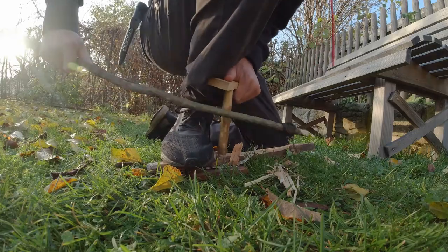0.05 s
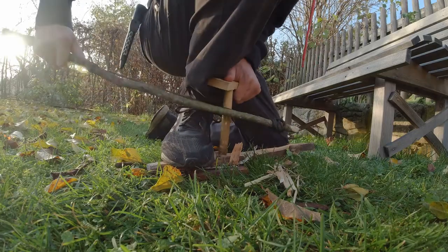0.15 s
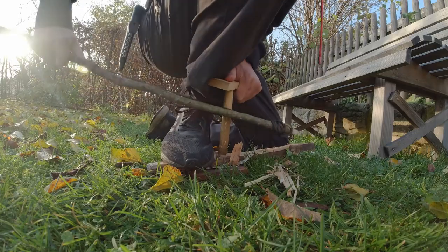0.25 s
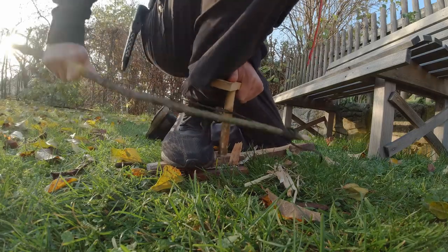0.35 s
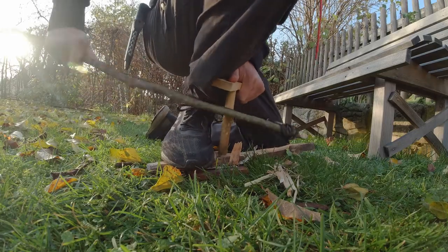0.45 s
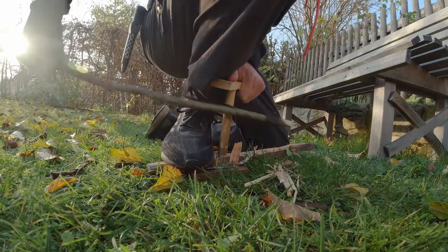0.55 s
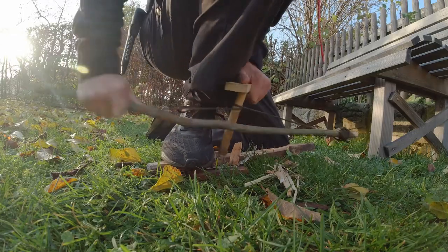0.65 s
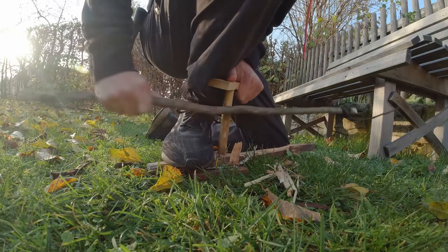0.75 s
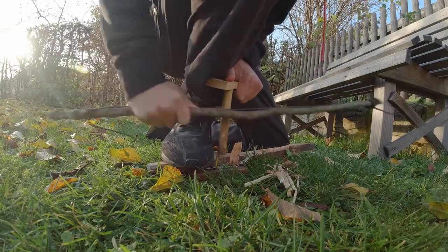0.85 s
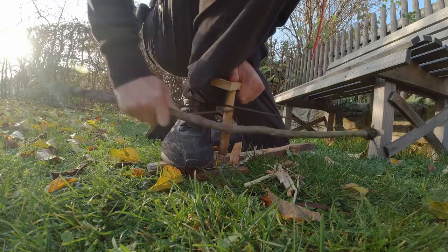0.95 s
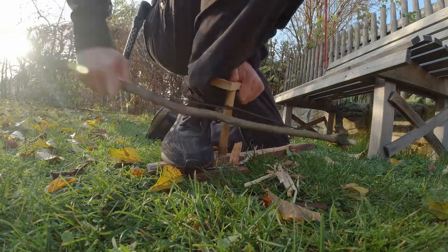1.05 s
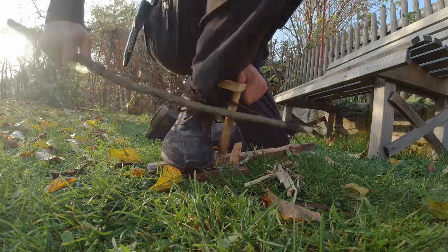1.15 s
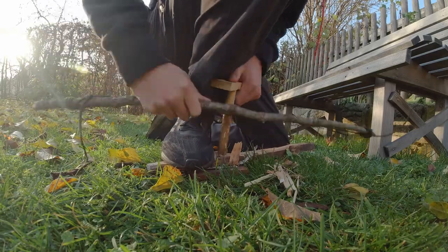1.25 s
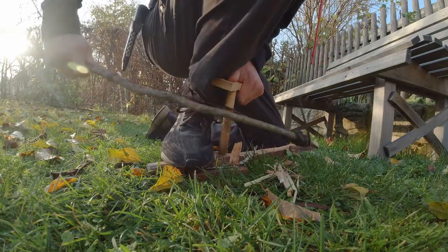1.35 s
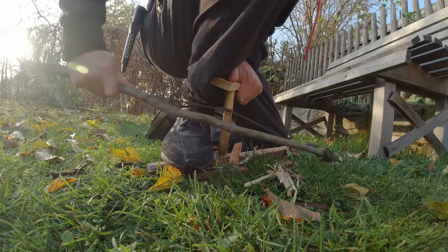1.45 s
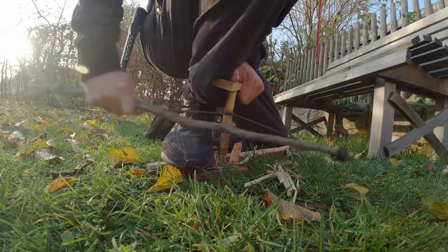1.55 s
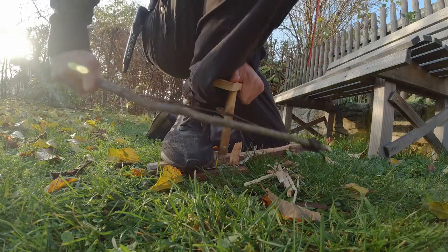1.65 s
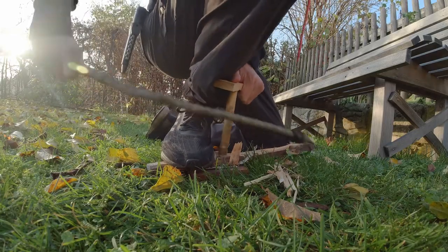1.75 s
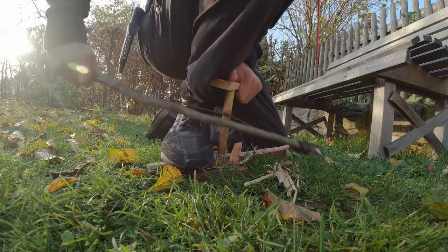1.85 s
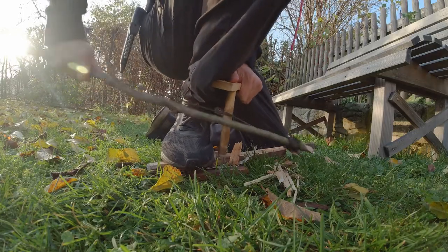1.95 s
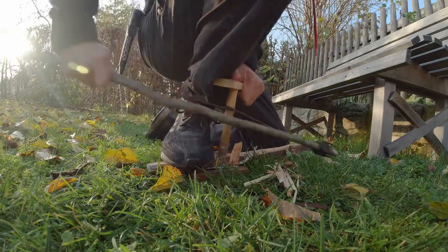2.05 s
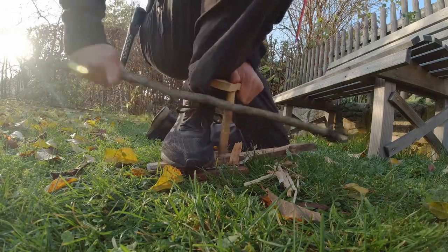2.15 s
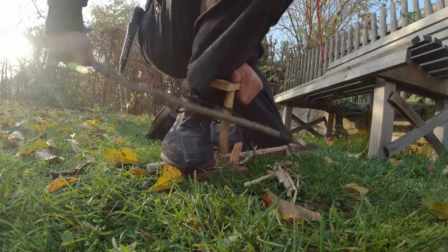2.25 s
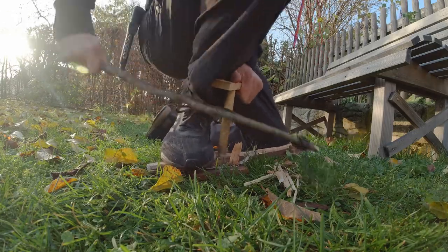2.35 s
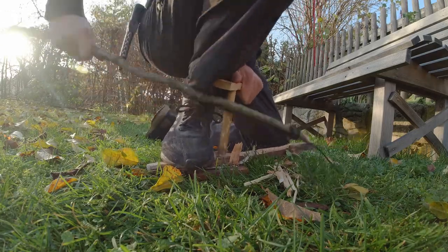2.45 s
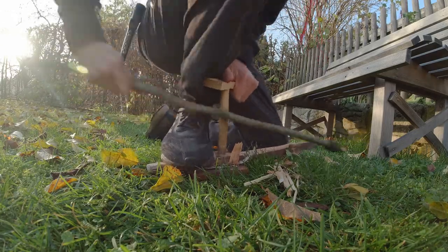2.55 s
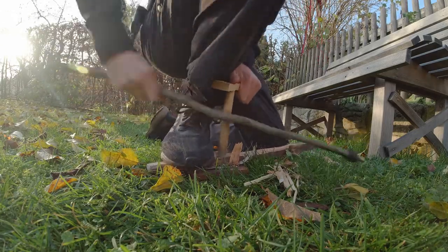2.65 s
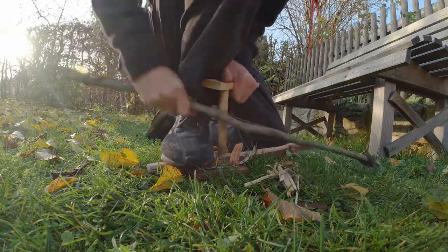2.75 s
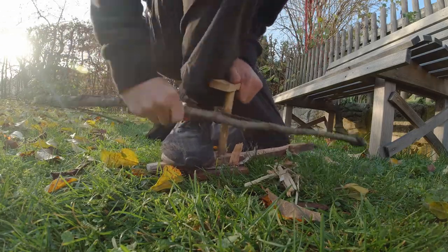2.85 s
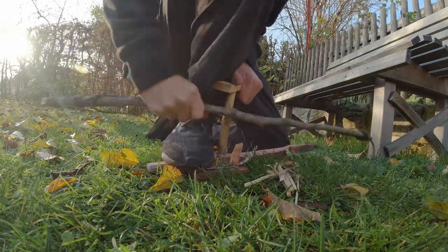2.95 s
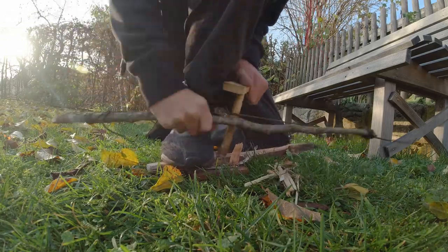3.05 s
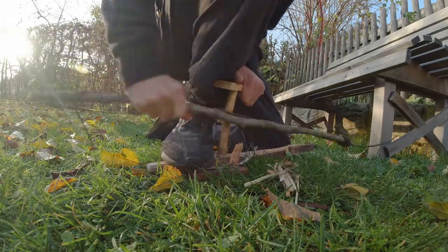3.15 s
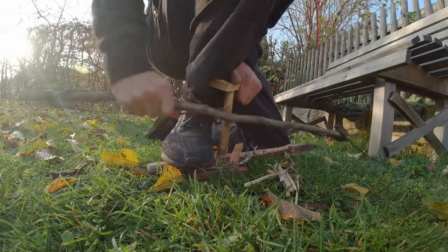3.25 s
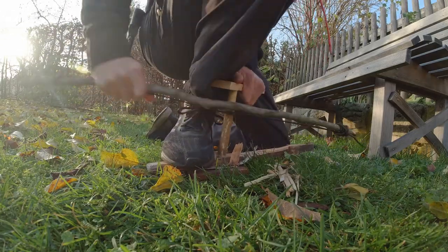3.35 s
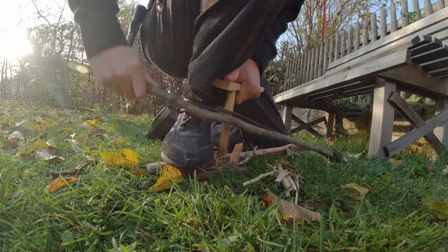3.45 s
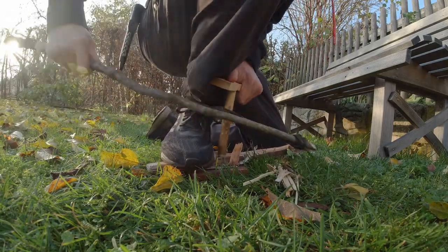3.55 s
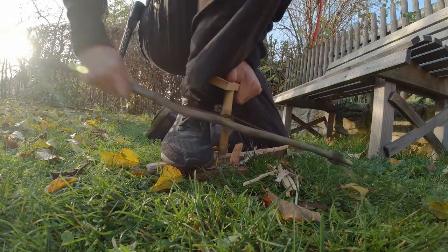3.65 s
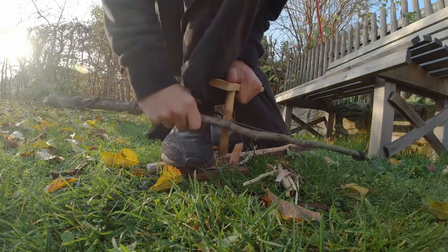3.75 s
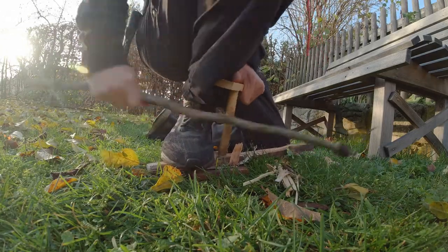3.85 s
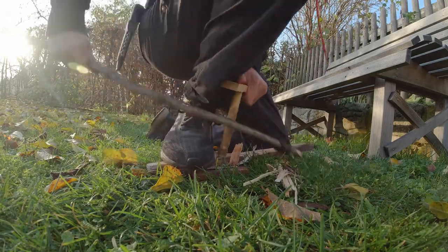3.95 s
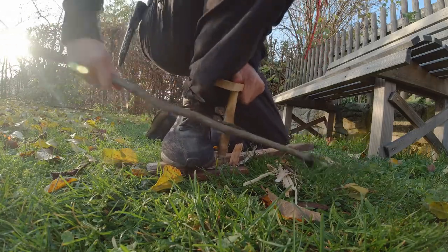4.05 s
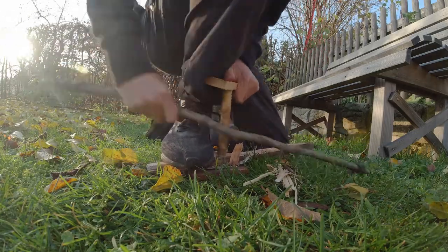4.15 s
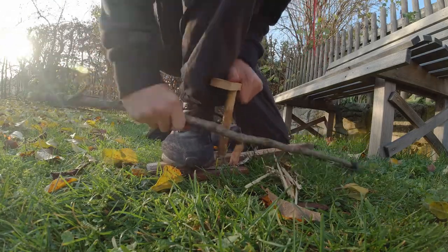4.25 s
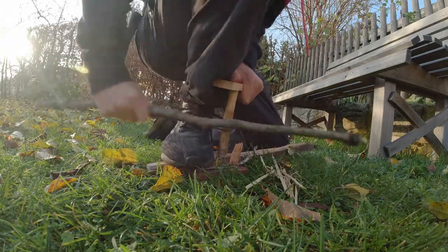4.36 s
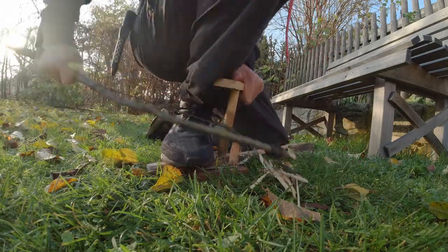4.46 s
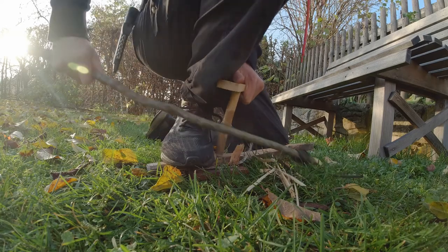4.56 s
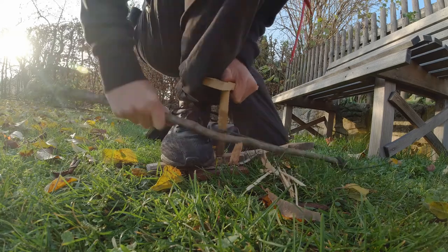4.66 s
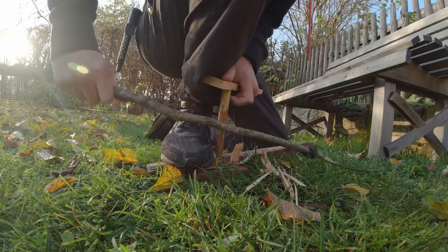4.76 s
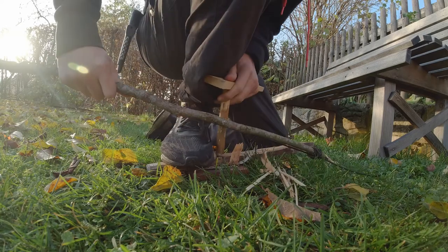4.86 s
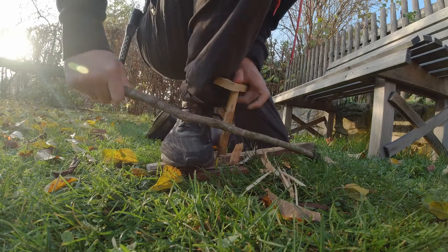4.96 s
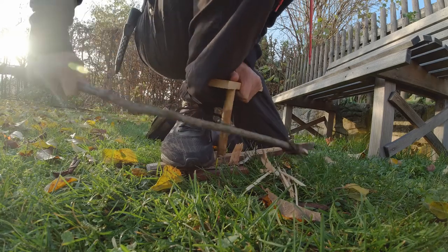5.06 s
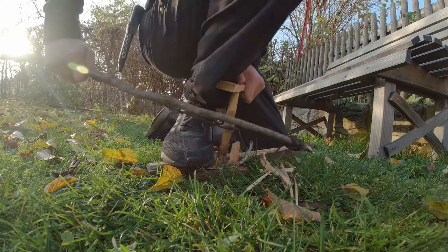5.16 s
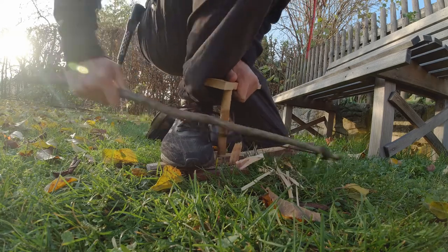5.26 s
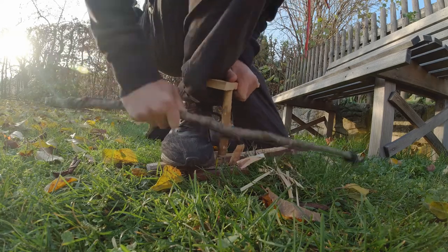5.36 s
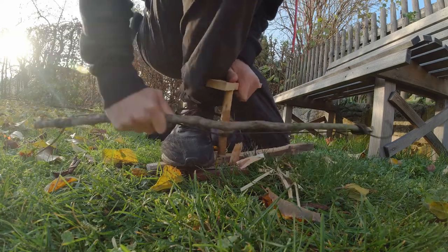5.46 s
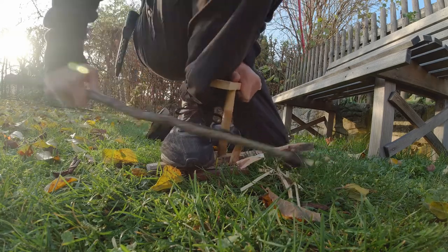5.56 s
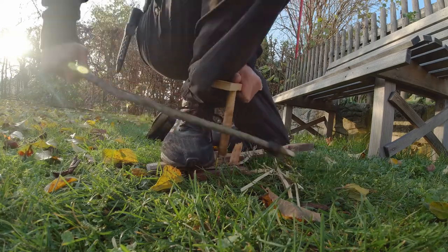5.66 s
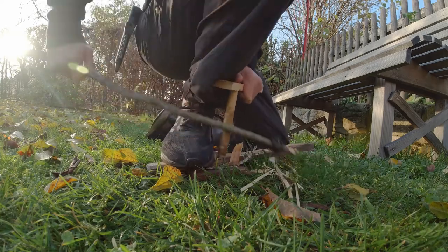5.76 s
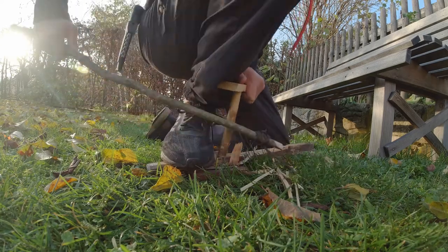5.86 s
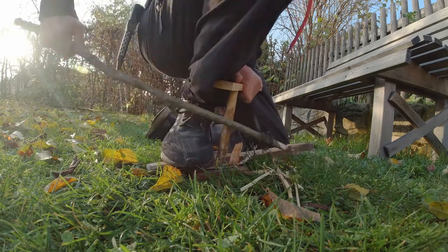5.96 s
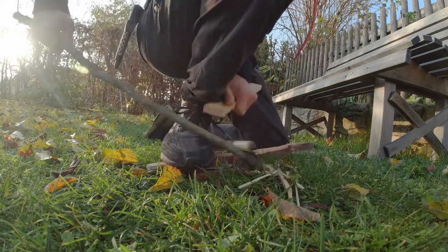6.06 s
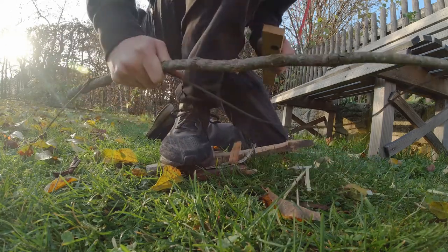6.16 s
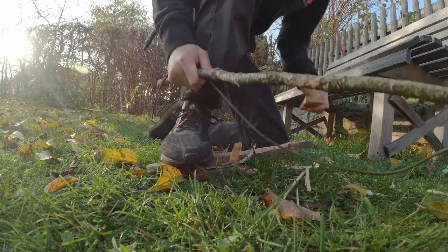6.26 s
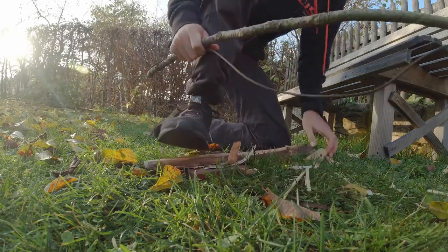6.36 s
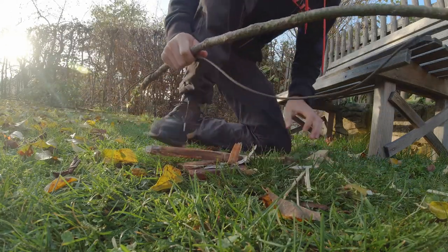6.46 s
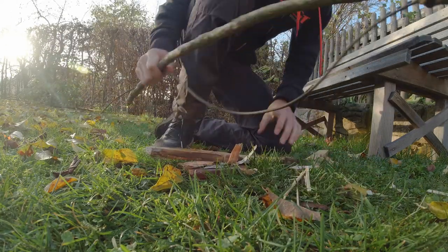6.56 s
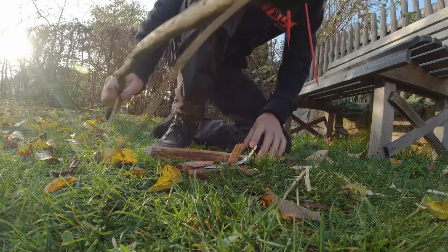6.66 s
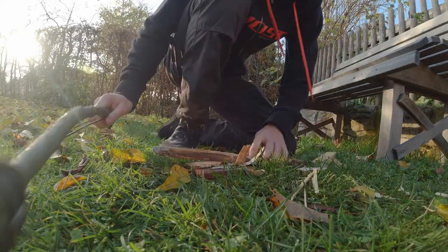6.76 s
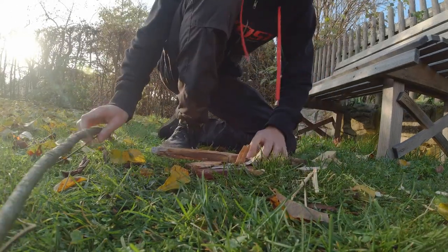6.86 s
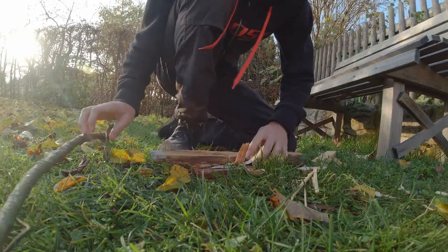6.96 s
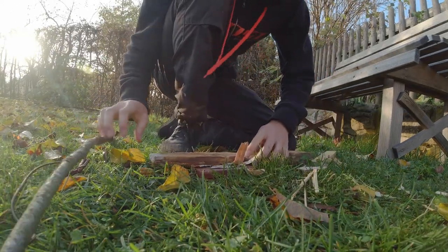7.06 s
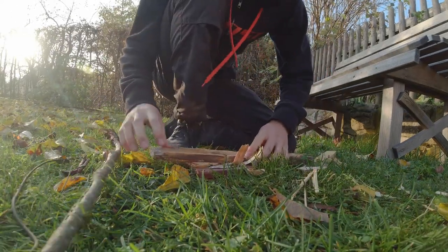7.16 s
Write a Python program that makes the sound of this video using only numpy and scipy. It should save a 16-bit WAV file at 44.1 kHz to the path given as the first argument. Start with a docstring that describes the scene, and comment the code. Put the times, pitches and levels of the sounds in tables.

```python
"""A bow drill on a lawn, close to a small stereo camera, in quiet outdoor air.
0-6.1 s: four spells of sawing. Each jerk of the cord turns the wooden spindle in its socket: it squeaks
by stick and slip, and grinds when it bites. The fireboard bumps on the soft ground now and then.
6.1-7.2 s: the spindle comes free, sticks knock, and the bow is laid in rustling grass and leaves."""
import sys
import numpy as np
from scipy import signal
from scipy.fft import rfft, irfft
from scipy.io import wavfile

SR = 44100
rng = np.random.default_rng(int(sys.argv[2]) if len(sys.argv) > 2 else 0)


def generate_wav(sig):
    """Save sig (samples, or channels by samples) to the path in sys.argv[1] as 16-bit PCM at SR."""
    pcm = np.round(np.clip(np.atleast_2d(sig).T, -1, 1) * 32767).astype(np.int16)
    wavfile.write(sys.argv[1], SR, pcm)


N = 317961
BLOCK = 8192  # samples per event

# cord jerks: t/s, length/s, squeak f/Hz, squeak level/dB, rasp level/dB, groan level/dB
JERKS = [(.061, 0.021, 1557, -27.5, -34.5, -57), (.102, 0.01, 1725, -27.5, -40, -65),
         (.121, 0.023, 1595, -21, -32.5, -51), (.166, 0.028, 1870, -31, -50, -66),
         (.223, 0.024, 1569, -24, -33.5, -68), (.274, 0.02, 1694, -31.5, -36, -56),
         (.333, 0.028, 1256, -51, -24.5, -54), (.381, 0.028, 1546, -32.5, -31, -73),
         (.434, 0.024, 1492, -25.5, -29, -59), (.54, 0.019, 1736, -33, -41, -63),
         (.595, 0.014, 1590, -33.5, -48, -42), (.64, 0.026, 1426, -24, -26, -54),
         (.694, 0.027, 1500, -57, -55, -48), (.757, 0.022, 1540, -35, -40.5, -69),
         (.868, .028, 1382, -24, -30, -53), (.996, 0.011, 1643, -27.5, -46, -73),
         (1.112, 0.027, 1495, -23, -31.5, -52), (1.217, 0.029, 1697, -49, -50, -55),
         (1.424, 0.011, 1528, -22.5, -39, -65), (1.442, 0.028, 1441, -38, -24.5, -35.5),
         (1.553, 0.024, 1282, -31.5, -26.5, -65), (1.649, 0.027, 1577, -25, -21.5, -50.5),
         (1.741, 0.023, 1527, -26, -29.5, -65), (1.847, .028, 1211, -28, -21, -38.5),
         (1.945, 0.027, 1781, -31, -19.5, -33.5), (2.048, 0.027, 1703, -47, -23, -30),
         (2.147, 0.027, 1544, -43, -39.5, -35.5), (2.208, 0.019, 1623, -31, -51, -61),
         (2.253, 0.022, 1601, -21, -35.5, -71), (2.301, 0.028, 1726, -32, -40, -70),
         (2.344, 0.039, 1246, -28.5, -36, -37), (2.436, 0.021, 1192, -30, -22, -34),
         (2.523, .024, 1197, -32, -21.5, -48), (2.607, 0.031, 1183, -41, -25, -40.5),
         (2.703, .023, 1900, -47, -29.5, -39.5), (2.79, .029, 1340, -27.5, -22.5, -31.5),
         (2.883, 0.019, 1321, -27.5, -23.5, -41), (2.938, 0.025, 1780, -32, -48, -76),
         (2.981, 0.015, 1514, -31.5, -25, -47), (3.075, 0.027, 1109, -36.5, -30, -36),
         (3.16, 0.025, 1307, -39, -33, -52), (3.271, 0.017, 1161, -27, -30.5, -46.5),
         (3.361, .019, 1564, -28.5, -28.5, -48), (3.623, 0.015, 1464, -28, -30, -57),
         (3.704, .024, 1494, -37, -24, -31.5), (3.788, 0.025, 1174, -34.5, -22.5, -46.5),
         (3.866, 0.021, 1086, -39.5, -25, -50), (3.951, 0.024, 1750, -45, -22.5, -36),
         (4.035, .021, 1300, -26, -31, -62), (4.119, 0.019, 1222, -27, -29, -47),
         (4.201, 0.016, 1242, -31.5, -24, -43.5), (4.278, .031, 1285, -42, -38.5, -54),
         (4.328, 0.019, 1533, -40, -45, -59), (4.371, .019, 1228, -23, -24, -35.5),
         (4.456, .014, 1515, -27.5, -39.5, -62), (4.497, 0.02, 1457, -39, -61, -36),
         (4.538, .024, 1204, -34.5, -37.5, -39.5), (4.578, 0.026, 1618, -46, -51.5, -44),
         (4.66, 0.019, 1450, -74, -81, -59), (4.702, .025, 1180, -81.5, -68, -50),
         (4.77, 0.017, 1035, -79, -87, -49.5), (4.916, 0.034, 936, -73.5, -79.5, -59),
         (5.146, 0.023, 1744, -33, -44, -49), (5.21, 0.039, 1710, -45, -45.5, -51),
         (5.266, 0.018, 1500, -36, -44, -50), (5.311, .02, 1608, -34, -37, -48),
         (5.391, 0.028, 1536, -40, -37.5, -50), (5.436, 0.015, 1777, -38, -43, -47),
         (5.477, 0.016, 1554, -37.5, -34, -52), (5.561, 0.016, 1536, -30.5, -34, -73),
         (5.608, .026, 1734, -41.5, -44, -67), (5.652, .017, 1332, -25, -32.5, -65),
         (5.747, 0.016, 1251, -19.5, -26, -63), (5.84, 0.017, 1168, -53, -25, -67),
         (5.934, 0.025, 1290, -40, -47, -44.5), (6.032, 0.017, 1232, -22, -23.5, -43),
         (6.074, 0.027, 1123, -41, -42, -37)]
# sawing spells: start/s, end/s, rubbing at start/dB, at end/dB, squeak octave/dB, extra hiss/dB
SPELLS = [(0.063, 1.227, -54.5, -54, -2.5, 4), (1.368, 3.411, -56.5, -52, -5, .5),
          (3.58, 4.68, -51, -55, -9, 0.5), (5.106, 6.118, -51, -49.5, -8.5, -3.5)]
# spindle and fireboard resonances: f/Hz, width/Hz, gain/dB
DRILL_MODES = [(542, 120, -7), (805, 17, 2.5), (1190, 90, 3.5), (1240, 38, 6.5), (1556, 98, 5),
               (1900, 180, 5), (2530, 130, -0.5), (2410, 72, -2.5), (2748, 17, 8), (3260, 270, 1),
               (5146, 210, 9.5), (6230, 560, 5), (9260, 30, 15.5), (9880, 160, 9.5), (10640, 57, 12)]
# bow resonances: f/Hz, width/Hz, gain/dB
BOW_MODES = [(927, 85, 4), (1817, 53, 9), (2850, 99, -4), (3800, 55, 1)]


def spindle(sag=0.0351, glide=0.02494, jitter=0.0393, bite_jitter=0.025, rise_share=0.5025):
    """Each turn is a short stick-slip squeak; every slip tears fibres, which rasp through the wood."""
    # grinding spectrum: f/Hz, level/dB
    grind_spectrum = [(120, -57.5), (200, -30), (491, -13), (821, -12.5), (1020, -14.5), (1300, -4.5),
                      (2020, -8), (2250, 2), (2910, 0.5), (3190, 4.5), (4040, -8), (5040, -15.5),
                      (8270, -20), (10900, -16.5), (16000, -28)]
    out, f = np.zeros((2, N)), freqs(BLOCK)
    t = (np.arange(BLOCK) - BLOCK // 2) / SR
    tone = colour(grind_spectrum, f) * resonances(f, DRILL_MODES)
    low, middle, high = (tone * band for band in bands(f))
    for at_s, length_s, hz, squeak_db, rasp_db, groan_db in JERKS + back_slips():
        rise_s, fall_s = rise_share * length_s, (1 - rise_share) * length_s
        octave_db, hiss_db = brightness(at_s, hz, squeak_db, rasp_db)
        force = swell(t, rise_s, fall_s, power=np.where(t < 0, 2.3, 1.7))
        # pitch sags as the spindle digs in, ragged where grinding outweighs the squeak
        bite = 1 / (1 + undb(squeak_db - rasp_db))
        ragged = (jitter + bite_jitter * bite * force) * walk(320, BLOCK)
        pitch_hz = hz * (1 + sag * (.8 - force) - glide * np.tanh(t / 0.014) + ragged)
        phase = 2 * np.pi * np.cumsum(pitch_hz) / SR
        squeak = undb(squeak_db + 2.2 * walk(97, BLOCK)) * np.sin(phase)
        squeak += undb(octave_db + 0.89 * walk(130, BLOCK)) * np.sin(2 * phase)
        for k in range(3, 8):  # pressure sharpens the slip
            overtone_db = max(squeak_db, octave_db) - 14 - 4 * (k - 2)
            squeak += force * undb(overtone_db) * np.sin(k * phase)
        # judder about once in two slips, most even on slow turns that hardly rasp
        judder_hz = 0.472 * hz
        slowness = 1 / (1 + undb(rasp_db - groan_db + 13.5))
        judder = 1 + undb(6 + 20 * slowness) / (1 + ((f / judder_hz - 1) / 0.08) ** 2)
        slips = (1 + 0.77 * np.cos(phase)) * undb(3.5 * walk(120, BLOCK))
        groan, rasp, hiss = (shaped(grit(2, BLOCK) * slips, g) for g in (low * judder, middle, high))
        grind = undb(groan_db) * groan + force ** 0.023 * (undb(rasp_db) * rasp + undb(hiss_db) * hiss)
        # a biting turn squeaks first, then breaks up into grinding
        lead_s = 0.58 * bite * rise_s
        squeak_env = swell(t + lead_s, rise_s * (1 - bite / 2), fall_s + bite * rise_s / 2, power=1.73)
        add(out, ports(1.316 * squeak_env * squeak + force * grind), at_s)
    return out


def brightness(at_s, hz, squeak_db, rasp_db, peak_hz=3100, width_hz=250, firm_db=-23.5):
    """Octave and hiss levels of a jerk: harder is brighter, and a squeak hisses less than a rasp."""
    nearest_spell = min(SPELLS, key=lambda row: abs(at_s - np.clip(at_s, row[0], row[1])))
    *_, octave_db, extra_hiss_db = nearest_spell
    resonance_db = 4.5 / (1 + (2 * (2 * hz - peak_hz) / width_hz) ** 2)
    effort_db = 20 * np.log10(np.hypot(undb(rasp_db), undb(squeak_db - 3.5)))
    hiss_db = effort_db - 8 + 0.54 * (effort_db - firm_db) + extra_hiss_db
    return squeak_db + octave_db + resonance_db, hiss_db


def back_slips(min_gap_s=.07, max_gap_s=.125, length_s=.022, centre_hz=1714, spread_db=5):
    """As the bow reverses between jerks, the spindle slips back faintly; rows as in JERKS."""
    rows = []
    for this, following, (height, size) in zip(JERKS, JERKS[1:], rng.standard_normal((len(JERKS), 2))):
        gap_s = following[0] - this[0]
        if min_gap_s < gap_s < max_gap_s:
            hz, db = centre_hz * (1 + 0.09 * height), spread_db * size
            rows.append((this[0] + 0.48 * gap_s, length_s, hz, db - 58, db - 63, db - 55.5))
    return rows


def rubbing(gain_db=-1, flutter_db=5.5, wobble_db=2, fizz_db=-11, firm_db=-54):
    """Cord and socket rub unevenly; the out-of-round spindle brushes again halfway between jerks."""
    # rubbing spectrum: f/Hz, level/dB
    rub_spectrum = [(150, -9.5), (400, -1), (750, 1.5), (1050, -13.5), (1600, -7), (2100, -1), (3100, -3.5),
                    (4200, -14), (7000, -28), (10500, -19.5), (15500, -29)]
    f, t = freqs(N), np.arange(N) / SR
    turn = np.interp(t, [row[0] for row in JERKS], np.arange(len(JERKS)))
    pressure = undb(wobble_db * np.cos(4 * np.pi * turn) + flutter_db * walk(28, N))
    fibres = grit(6.4, (2, N)) * pressure
    tone = colour(rub_spectrum, f) * resonances(f, DRILL_MODES)
    low, middle, high = bands(f)
    strength = sawing()
    # firmer rubbing fizzes more
    fizz = undb(fizz_db) * (strength / undb(firm_db)) ** 0.46 * shaped(fibres, tone * high)
    return (shaped(fibres, tone * (low + middle)) + fizz) * strength * undb(gain_db)


def sawing(rest_db=-75.5, fade_db_per_s=213):
    """Rubbing strength: drifts through each spell, fades in pauses, ends as the spindle comes free."""
    t = np.arange(N) / SR
    gain = undb(rest_db) * (t < SPELLS[-1][1])
    for start_s, end_s, first_db, last_db, *_ in SPELLS:
        outside_s = np.abs(t - np.clip(t, start_s, end_s))
        spell_db = np.interp(t, [start_s, end_s], [first_db, last_db])
        gain = np.maximum(gain, undb(spell_db - fade_db_per_s * outside_s))
    return gain


def creaks(count=190, until_s=6.1, low_hz=480, high_hz=2100, length_s=0.0053, gain_db=2, spread_db=4):
    """The loose spindle catches at random for a few cycles: tiny falling chirps."""
    out, sawing_db = np.zeros((2, N)), 20 * np.log10(sawing())
    t = np.linspace(-.02, .02, int(.04 * SR))
    for when, height, size, span, side in rng.random((count, 5)):
        start = int(until_s * when * SR)
        hz = low_hz * (high_hz / low_hz) ** height
        phase = 2 * np.pi * np.cumsum(hz * (1 - .08 * np.tanh(t / length_s))) / SR
        phase = phase + np.pi * side * np.array([[.5], [-.5]])
        chirp = np.sin(phase) + undb(-9) * np.sin(2 * phase)
        db = sawing_db[start + len(t) // 2] + gain_db + spread_db * (2 * size - 1)
        catch = np.exp(-(t / (length_s * (.5 + span))) ** 2) * np.hanning(len(t))
        out[:, start:start + len(t)] += undb(db) * catch * chirp
    return out


def bumps(gain_db=-5, rise_s=.019, fall_s=0.021, drop=0.056, rough=0.05):
    """Board, boot and bow thud on the turf: a few uneven low cycles that drop in pitch."""
    # ground thuds: t/s, level/dB, f/Hz
    thuds = [(2.496, -36.5, 150), (5.327, -33.5, 140.4), (6.153, -35.5, 146.6), (6.611, -42.5, 221),
             (6.799, -55.5, 86), (6.928, -49, 144), (6.998, -44.5, 114.3)]
    out = np.zeros((2, N))
    t = (np.arange(BLOCK) - BLOCK // 2) / SR
    for at_s, db, hz in thuds:
        pitch_hz = hz * (1 - drop * np.tanh(t / 0.071) + rough * walk(83, BLOCK))
        thud = np.sin(2 * np.pi * np.cumsum(pitch_hz) / SR) + 0.45 * walk(330, BLOCK)
        add(out, ports(undb(db + gain_db) * thud * swell(t, rise_s, fall_s, power=2.6)), at_s + 0.003)
    return out


def handling(grain_db=7):
    """Damp sticks and cord knock and brush, in a pause and as they are put down."""
    # contacts: t/s, rise/s, fall/s, body level/dB, clack level/dB, swish level/dB
    contacts = [(4.83, 0.012, 0.045, -55, -60.5, -83.5), (5.02, .02, .04, -57, -62.5, -83),
                (6.186, 0.0079, 0.044, -55, -51, -63.5), (6.385, 0.007, 0.0046, -46, -47, -66.5),
                (6.602, 0.013, 0.011, -46, -56, -83.5), (6.678, 0.0063, 0.019, -74, -52, -50),
                (6.788, 0.00038, 0.0055, -37, -31, -57), (6.798, 0.0017, 0.014, -47, -27.5, -54.5),
                (6.857, .001, 0.0035, -62, -57, -76), (6.921, 0.011, 0.011, -51.5, -51.5, -58)]
    # stick spectrum: f/Hz, level/dB
    stick_spectrum = [(100, 2.5), (600, -7), (1000, -3.5), (1400, -1), (1950, -1.5), (2500, 2.5),
                      (3200, -1), (4500, -5), (7000, -10), (10000, -3), (13000, -26), (16000, -42)]
    out, f = np.zeros((2, N)), freqs(BLOCK)
    t = (np.arange(BLOCK) - BLOCK // 2) / SR
    tone = colour(stick_spectrum, f) * resonances(f, BOW_MODES)
    for at_s, rise_s, fall_s, *levels_db in contacts:
        snaps = grit(grain_db, BLOCK)
        knock = sum(undb(db) * shaped(snaps, tone * band) for db, band in zip(levels_db, bands(f)))
        add(out, ports(knock * swell(t, rise_s, fall_s, power=1.39)), at_s)
    return out


def leaves(grain_db=7.5, flutter_db=1.6):
    """Grass and dry leaves rustle as sleeves and bow slide through them."""
    # slides: t/s, rise/s, fall/s, rustle level/dB, crackle level/dB
    slides = [(6.4, .25, 0.33, -73.5, -84), (6.81, 0.069, 0.058, -44.5, -71.5),
              (6.97, 0.052, 0.11, -62, -67.5)]
    # leaf spectrum: f/Hz, level/dB
    leaf_spectrum = [(200, 1.5), (600, 2), (1000, 3.5), (1400, -2), (1900, 3), (3000, -4.5), (5000, -11.5),
                     (7000, -28.5), (9800, -21), (11500, -53.5), (16000, -43)]
    out, f, t = np.zeros((2, N)), freqs(N), np.arange(N) / SR
    low, middle, high = bands(f)
    blades = grit(grain_db, (2, N)) * undb(flutter_db * walk(66, N))
    tone = colour(leaf_spectrum, f) * resonances(f, BOW_MODES)
    rustle, crackle = shaped(blades, tone * (low + middle)), shaped(blades, tone * high)
    for at_s, rise_s, fall_s, rustle_db, crackle_db in slides:
        push = swell(t - at_s, rise_s, fall_s, power=0.89)
        out += push * (undb(rustle_db) * rustle + undb(crackle_db) * crackle)
    return out


def garden(air_db=-65, gust_db=1.8, stir_db=-65.5, stir_s=6.83, shared=0.43):
    """Distant air, mostly rumble, partly common to both ports; it swells as someone gets up."""
    # air spectrum: f/Hz, level/dB
    air_spectrum = [(12, -39.5), (20, -0.5), (49, -5.5), (142, -10.5), (216, -6.5), (472, -31.5),
                    (607, -42), (1260, -44), (3250, -35.5), (5680, -59.5), (16000, -63.5)]
    noise = rng.standard_normal((2, N)) + shared * rng.standard_normal(N)
    gusts = undb(gust_db * walk(6, N))
    stir = undb(stir_db) * swell(np.arange(N) / SR - stir_s, rise_s=0.23, fall_s=0.26, power=2.2)
    return shaped(noise, colour(air_spectrum, freqs(N))) * gusts * (undb(air_db) + stir)


def ports(x, scatter_rad=0.74, hz_per_rad=7000):
    """The camera body bends the sound round to two microphone ports; phases scatter more in the treble."""
    # lead of the left port: f/Hz, phase/rad
    left_lead = [(100, -5.5), (400, 1.6), (750, 1.5), (1000, 1.5), (1150, -4.5), (1320, -1.33),
                 (1520, -1.4), (1750, -5), (2100, -2), (2650, -1.5), (3080, -5.5), (3400, -4), (5000, -8)]
    f = freqs(BLOCK)
    lead_rad = np.interp(f, *np.transpose(left_lead))
    noise = rng.standard_normal((2, len(f)))
    wander = unit(signal.fftconvolve(noise, np.hanning(160)[None], "same", axes=1))
    phase = np.array([[.5], [-.5]]) * lead_rad + wander * (scatter_rad + f / hz_per_rad)
    return irfft(rfft(x) * np.exp(1j * phase))


def resonances(f, modes):
    """Gain of resonating wood."""
    return 1 + sum((undb(db) - 1) / (1 + (2 * (f - hz) / width_hz) ** 2) for hz, width_hz, db in modes)


def grit(spread_db, shape):
    """Countless tiny snaps of unequal size."""
    return rng.standard_normal(shape) * undb(spread_db * rng.standard_normal(shape))


def swell(t, rise_s, fall_s, power):
    """Envelope, 10 dB down at -rise_s and at fall_s."""
    return 10 ** (-.5 * (np.abs(t) / np.maximum(np.where(t < 0, rise_s, fall_s), 1e-4)) ** power)


def walk(rate_hz, size):
    """Smooth random drift, rms 1."""
    return shaped(rng.standard_normal(size), 1 / (1 + (freqs(size) / rate_hz) ** 4))


def bands(f, low_hz=1000, high_hz=4200):
    """Low, middle and high gains that sum to 1."""
    low, high = 1 / (1 + (f / low_hz) ** 14), 1 / (1 + (high_hz / f) ** 14)
    return low, 1 - low - high, high


def colour(points, f):
    """Gain through (f/Hz, level/dB) points."""
    hz, db = np.transpose(points)
    return undb(np.interp(np.log(f), np.log(hz), db))


def shaped(x, gain):
    """Filter by a gain per bin; rms 1."""
    return unit(irfft(rfft(x) * gain, x.shape[-1]))


def freqs(size):
    """Bin frequencies, at least 1 Hz."""
    return np.maximum(np.fft.rfftfreq(size, 1 / SR), 1)


def undb(db):
    """Decibels to gain."""
    return 10 ** (np.asarray(db) / 20)


def unit(x):
    """Scale to rms 1."""
    return x / np.sqrt(np.mean(x ** 2) + 1e-30)


def add(out, x, at_s):
    """Mix in a block centred on at_s."""
    start = int(at_s * SR) - BLOCK // 2
    a, b = max(start, 0), min(start + BLOCK, N)
    out[:, a:b] += x[..., a - start:b - start]


def scene():
    """The drill and its handling, dry in the open garden."""
    return spindle() + rubbing() + creaks() + bumps() + handling() + leaves() + garden()


def record(dry):
    """The camera cuts the treble above 15.9 kHz."""
    return signal.sosfilt(signal.ellip(10, .2, 70, 15900, fs=SR, output="sos"), dry)


dry = scene()
out = record(dry)
generate_wav(out)
```